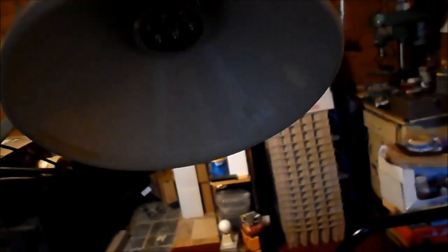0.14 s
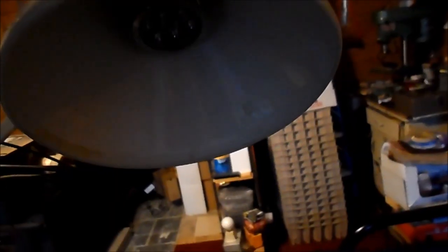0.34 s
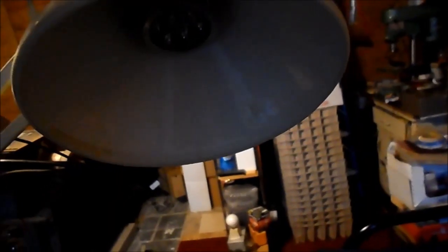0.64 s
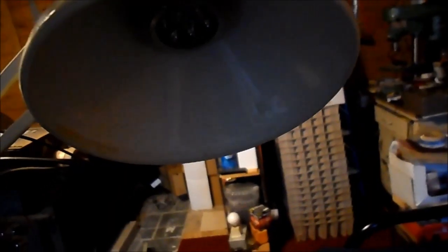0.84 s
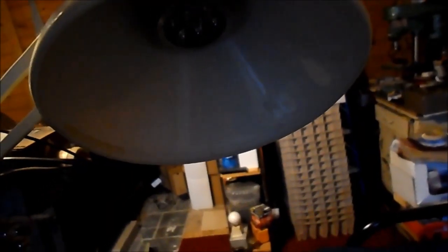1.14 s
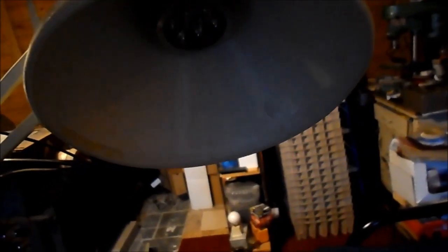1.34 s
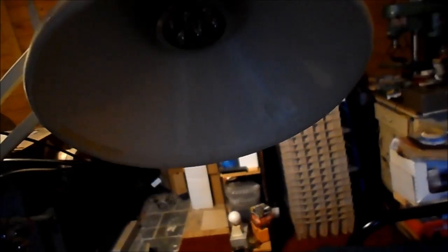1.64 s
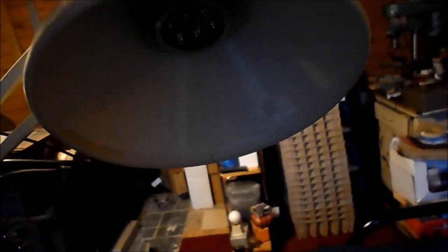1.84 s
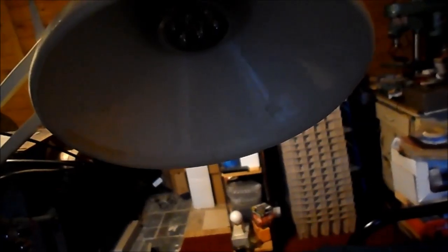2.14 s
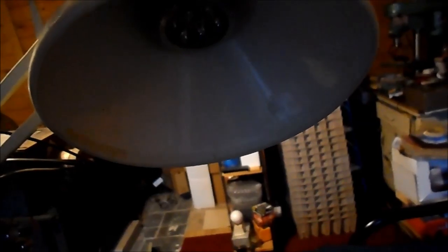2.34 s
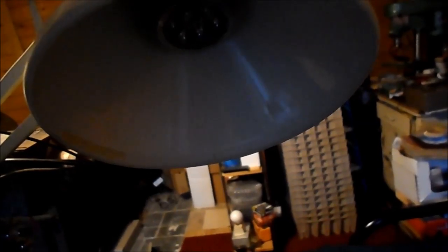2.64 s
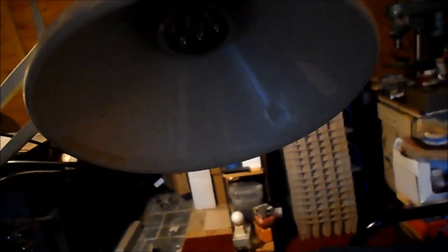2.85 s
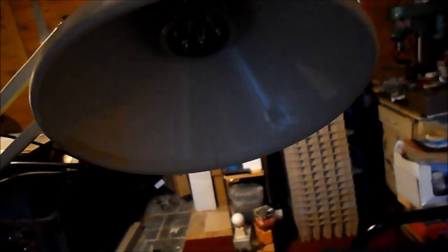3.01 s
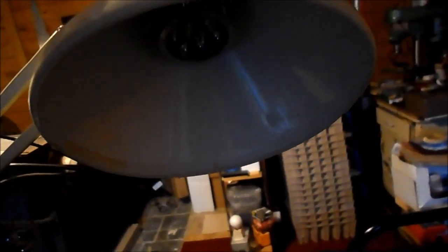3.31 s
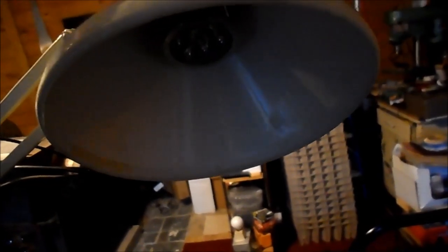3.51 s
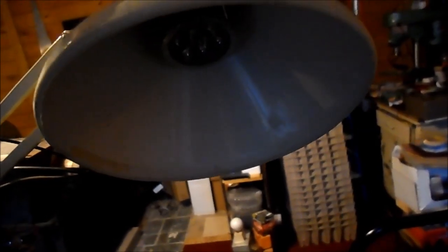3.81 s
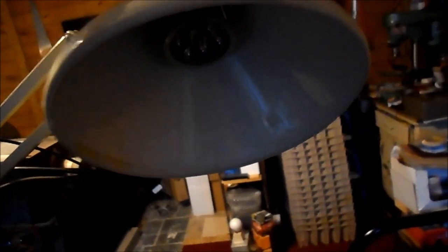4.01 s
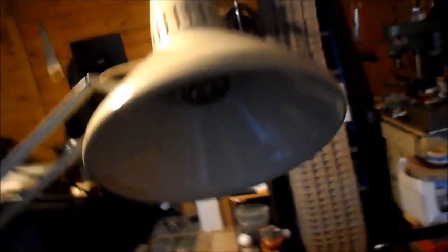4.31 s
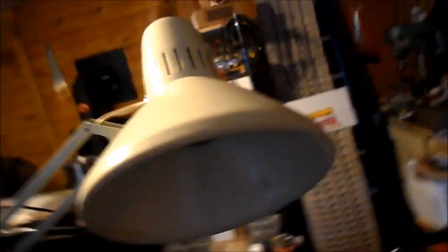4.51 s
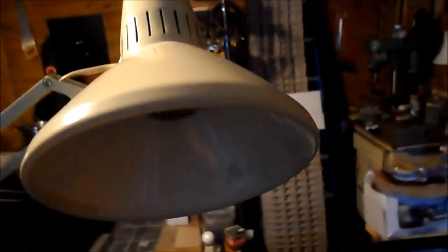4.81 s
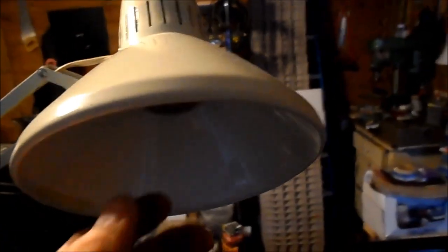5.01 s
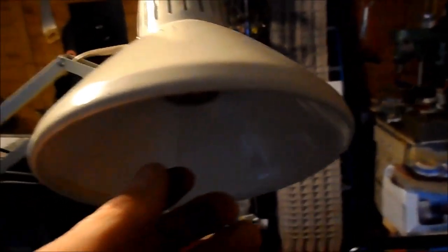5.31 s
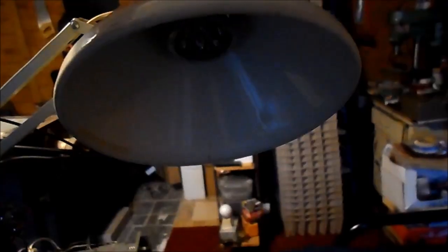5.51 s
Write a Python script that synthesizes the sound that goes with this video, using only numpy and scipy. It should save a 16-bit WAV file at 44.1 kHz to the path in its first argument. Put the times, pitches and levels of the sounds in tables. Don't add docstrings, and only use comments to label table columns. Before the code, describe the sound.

Mostly quiet mono sound, close and dry with a short indoor room tail. Two loud switch snaps stand out, the first bouncing, the second crisper; a slightly weaker knob click lands between them. Each makes the thin metal shade ring faintly. Small knocks, taps, grainy joint rubbing and grip rumble fill in later, over steady preamp hiss, mains hum and a faint pulsing whine.

```python
import sys
import numpy as np
from scipy import signal
from scipy.fft import rfft, irfft
from scipy.io import wavfile
from scipy.ndimage import uniform_filter1d

SR = 44100
rng = np.random.default_rng(int(sys.argv[2]) if len(sys.argv) > 2 else 0)


def generate_wav(signal):
    frames = np.transpose(np.atleast_2d(signal))
    scaled = np.clip(frames, -1, 1) * 32767
    pcm = np.round(scaled).astype(np.int16)
    wavfile.write(sys.argv[1], SR, pcm)


def boost(x):
    u = np.asarray(x, float) / 20
    return 10 ** u


N = 249606


def shaped(x, shape):
    hz, db = np.transpose(shape)
    f = np.arange(len(x) // 2 + 1) * SR / len(x)
    curve_db = np.interp(np.log(f + 1), np.log(hz), db)
    return irfft(rfft(x) * boost(curve_db), len(x))


def unit(x):
    return x / np.sqrt(np.sum(x ** 2))


def below(x, top_hz):
    return signal.sosfilt(signal.ellip(8, .2, 70, top_hz, fs=SR, output="sos"), x)


def noise(shape):
    x = shaped(rng.standard_normal(N), shape)
    return x / x.std()


def walk(rate_hz):
    k = int(SR / rate_hz)
    x = uniform_filter1d(uniform_filter1d(rng.standard_normal(N), k), k)
    return x / x.std()


def swells(table):
    t = np.arange(N) / SR
    power = np.zeros(N)
    for s, db, rise, fall in table:
        drop_db = np.where(t < s, rise * (s - t), fall * (t - s))
        power += boost(db - drop_db) ** 2
    return 10 * np.log10(power + 1e-14)


def rings(t, hz, t60, gain):
    fades = np.exp(-np.log(1000) * np.outer(1 / t60, t))
    return gain @ (fades * np.sin(2 * np.pi * np.outer(hz, t)))


def chatter(rattle_s):
    n = np.arange(512)
    fade = np.exp(-n / SR / rattle_s) * np.minimum(n / 6, 1)
    limit = fade / np.sqrt(np.sum(fade ** 2)) * 2
    x = rng.standard_normal(512) * fade
    for _ in range(6):
        tones = rfft(unit(x))
        x = np.clip(irfft(tones / np.abs(tones)), -limit, limit)
    return unit(x)


# (pitch [Hz], level [dB])
WALL_COLOUR = [(500, -5), (2000, -1), (8000, -3.5), (11000, -2), (14000, -11.5), (15800, -12),
               (16200, -43.5)]
SPOT_DB = 2


def echoes(t, hz, width, gain, crack_db, near_db, room_db, room_t60):
    f = np.arange(len(t) // 2 + 1) * SR / len(t)
    off_peak = (f - hz[:, None]) / (0.56 * width[:, None])
    spread = gain ** 2 @ (1 / width[:, None] / (1 + off_peak ** 2))
    spread = np.sqrt(spread / spread.mean() + boost(crack_db) ** 2)
    scatter = rng.standard_normal(len(t)) * boost(near_db) * np.exp(-t / 0.006)
    walls = shaped(rng.standard_normal(len(t)), WALL_COLOUR)
    walls *= boost(room_db) * np.exp(-np.log(1000) * t / room_t60)
    onset = 1 - np.exp(-t / 0.0011)
    return irfft(rfft(scatter + walls) * spread, len(t)) * onset * (t < .45)


def balanced(sound, bands_db, band_hz):
    power = np.abs(rfft(sound[:384])) ** 2
    f = np.arange(len(power)) * SR / 384
    have_db = [10 * np.log10(power[abs(np.log(f + 1) - np.log(c)) < .2].sum()) for c in band_hz]
    colour = sorted(zip(band_hz, np.array(bands_db) - have_db + 42))
    lowest_db, highest_db = colour[0][1], colour[-1][1]
    colour = [(420., lowest_db - 22)] + colour + [(15500., highest_db), (17000., highest_db - 20)]
    padded = shaped(np.r_[np.zeros(512), sound], colour)
    return padded * np.clip(np.arange(len(padded)) / 16 - 30.5, 0, 1)


def click(bands_db, band_hz, body, shade_modes, rattle_s, crack_db, shade_db, near_db, room_db, room_t60):
    t = np.arange(SR // 2) / SR
    hz, width, db = np.transpose(body)
    gain = boost(db + SPOT_DB * rng.standard_normal(len(hz))) * np.sqrt(width)
    signs = (-1) ** np.arange(len(hz))
    housing = unit(rings(t, hz, 2.55 / width, gain * signs)) + boost(crack_db) * (t == 0)
    direct = signal.fftconvolve(chatter(rattle_s), housing)[:len(t)]
    echo = echoes(t, hz, width, gain, crack_db, near_db, room_db, room_t60)
    shade_hz, db, t60 = np.transpose(shade_modes)
    shade_gain = boost(db + shade_db + SPOT_DB * rng.standard_normal(len(shade_hz)))
    shade = rings(t, shade_hz, t60, shade_gain) * (1 - np.exp(-t / 0.0024))
    return balanced(direct + echo + shade, bands_db, band_hz)


def clicks(table, body, shade_modes, tone, **how):
    out = np.zeros(N + SR)
    hz, tone_db = np.transpose(tone)
    octaves = np.log2(hz / 4000)
    for s, db, hard, spot_db in table:
        bands_db = db + tone_db + hard * octaves + spot_db * (-1) ** np.arange(len(hz))
        sound = click(bands_db, hz, body, shade_modes, **how)
        at = int(s * SR) - 512
        out[at:at + len(sound)] += sound
    return out[:N]


# (pitch [Hz], level [dB], t60 [s])
SHADE_MODES = [(2245, -15, 0.13), (3160, -18.5, 0.15), (3300, -16, 0.15), (3640, -14.5, 0.12),
               (4950, -7, 0.12), (5740, -12.5, 0.22), (6500, -8.5, .13), (7050, -12.5, 0.15),
               (8030, -10.5, .15)]
SWITCH_ON_BLOWS = [
    (1.4112, -12, 0.1, 0.1),
    (1.4200, -18.5, 0.1, 0.1),
]
SWITCH_ON_BODY = [(754, 64, -19), (2200, 450, -4.5), (3207, 220, -0.5), (4450, 600, -8), (5770, 130, 0.6),
                  (6540, 200, 0), (7600, 230, -9.5), (8230, 300, -7), (9250, 550, -5.5), (10300, 780, -31),
                  (12290, 130, -12), (13900, 800, -18)]
SWITCH_ON_TONE = [(900, -19.5), (2100, -15), (3200, -11), (5800, 0.5), (8800, -0.4), (12500, -8),
                  (15400, -14)]


def switch_on():
    return clicks(SWITCH_ON_BLOWS, SWITCH_ON_BODY, SHADE_MODES, SWITCH_ON_TONE, rattle_s=0.0015,
                  crack_db=-10.0, shade_db=-45, near_db=-26, room_db=-36, room_t60=.2)


SWITCH_OFF_BLOWS = [
    (3.9896, -12, -0.16, 0.3),
]
SWITCH_OFF_BODY = [(783, 67, -24), (2100, 300, -15.5), (3510, 270, -5), (4014, 250, -9), (5120, 820, -10.5),
                   (6200, 360, -10), (6970, 700, -4.5), (9040, 1700, 5), (10210, 320, -33.5),
                   (11300, 940, -12.5), (12340, 220, -10.5), (14820, 260, 0.5), (14390, 440, -6.5)]
SWITCH_OFF_TONE = [(900, -27), (2200, -15), (2800, -20), (3800, -7.5), (5800, -5.5), (8800, 0), (13000, -1)]


def switch_off():
    return clicks(SWITCH_OFF_BLOWS, SWITCH_OFF_BODY, SHADE_MODES, SWITCH_OFF_TONE, rattle_s=0.00069,
                  crack_db=-5.5, shade_db=-48.0, near_db=-31.5, room_db=-39.5, room_t60=.19)


# (pitch [Hz], t60 [s])
RIM_MODES = [(2632, .6), (2657, .6), (3206, .38), (3468, .36)]
# (time [s], then level of each long ring [dB])
RIM_BLOWS = [
    (1.412, -57, -58.5, -45, -54),
    (3.99, -68, -69, -51, -55.5),
]


def rim():
    t = np.arange(N) / SR
    hz, t60 = np.transpose(RIM_MODES)
    return sum(rings(np.maximum(t - s, 0), hz, t60, boost(dbs)) for s, *dbs in RIM_BLOWS)


# (pitch [Hz], level [dB], t60 [s])
SHADE_BELL = [(3206, -16, .38), (3468, -21, .36)]
KNOB_BLOWS = [
    (3.3301, -20.5, 0.46, 0.5),
    (4.2093, -34, -0.4, 2.5),
    (4.2653, -31.5, -0.39, 2.5),
    (4.2724, -32.5, -1.1, -2.5),
]
KNOB_MODES = [(797, 85, -5), (1800, 87, -5), (2256, 146, -2), (3280, 250, -8.5), (3620, 130, -9.5),
              (4946, 170, -4.5), (6260, 250, 1.5), (7100, 330, 1.5), (7940, 260, 1), (8600, 150, -4),
              (9400, 100, -8.5), (10000, 167, -13), (12840, 200, -43), (15300, 500, -27)]
KNOB_COLOUR = [(800, -26.5), (2200, -4), (3500, -11), (7000, -0.5), (12500, -22)]


def knob():
    return clicks(KNOB_BLOWS, KNOB_MODES, SHADE_MODES + SHADE_BELL, KNOB_COLOUR, rattle_s=0.00097,
                  crack_db=-25, shade_db=-39, near_db=-23, room_db=-33.5, room_t60=0.19)


JOINT_BLOWS = [(4.7824, -61, -9, 8), (4.8212, -55, 3, 2), (4.876, -65, -2.2, -1), (5.21, -41.5, -4, 0.5),
               (5.2179, -38, -0.7, 1), (5.263, -56.5, 3, 3), (5.4114, -67, 5.5, -2)]
JOINT_MODES = [(1420, 220, -27), (2300, 310, -9.5), (3210, 220, -7.5), (5160, 1400, -1.5), (8050, 710, 6),
               (9500, 730, 11.5), (12300, 170, -29), (13100, 500, -27)]
JOINT_COLOUR = [(900, -20.5), (2600, -4), (5800, -2.5), (8800, 2.5), (13000, -22)]


def joint_ticks():
    return clicks(JOINT_BLOWS, JOINT_MODES, SHADE_MODES, JOINT_COLOUR, rattle_s=.0003,
                  crack_db=-12.0, shade_db=-62, near_db=-38, room_db=-44, room_t60=.15)


# (peak time [s], rasp level [dB], build-up [dB per s], fade [dB per s])
JOINT_SLIPS = [
    (3.987, -56.5, 701, 2999.5),
    (4.62, -73, 400, 250),
    (4.8, -63, 78.5, 56),
    (4.824, -56, 1500, 150),
    (5.262, -66, 900, 240),
    (5.42, -75, 97, 300),
]
# (pitch [Hz], level [dB per Hz])
RASP_COLOUR = [(2500, -12.5), (4500, 0), (6500, 4.5), (9500, 5.5), (11000, -9), (14000, -42)]
THRUM_COLOUR = [(60, -6), (200, 6.5), (450, -2.5), (800, -2.5), (1300, -13.5), (2200, -5.5), (3200, -23.5)]


def rubbing():
    rasp_db = swells(JOINT_SLIPS)
    thrum_db = -58.5 + 0.45 * (rasp_db + 58.5)
    rasp = noise(RASP_COLOUR) * boost(rasp_db + 2.5 * walk(120))
    return rasp + noise(THRUM_COLOUR) * boost(thrum_db + 2.4 * walk(50))


TOUCH_BLOWS = [(0.7008, -46, 4, 3.5), (0.7741, -49.5, 0.3, -2.5), (2.1294, -62.5, 1, 2),
               (3.2146, -55.5, -4, -1.5), (3.4124, -50.5, 0, -2), (3.4494, -61.5, -4, -1),
               (3.467, -57, 5, -4)]
TOUCH_MODES = [(787, 120, -10), (2153, 110, -1.5), (3380, 150, 3), (5000, 470, -12), (5600, 400, -7.5),
               (6420, 250, 0.5), (7360, 680, -19)]
TOUCH_COLOUR = [(800, -4.5), (2200, 0), (3350, 0), (5200, -5.5), (6600, -4)]


def touches():
    return clicks(TOUCH_BLOWS, TOUCH_MODES, SHADE_MODES + SHADE_BELL, TOUCH_COLOUR, rattle_s=0.0012,
                  crack_db=-18, shade_db=-33.5, near_db=-26.5, room_db=-30.5, room_t60=0.18)


TAP_BLOWS = [
    (4.319, -56, 0.1, 5),
    (4.3485, -47.5, 0.1, 0.1),
    (4.357, -54.5, 0.1, 0.1),
]
TAP_MODES = [(1100, 250, -8), (1800, 150, -8), (2160, 200, -8), (3200, 170, -4), (4800, 200, -13),
             (5440, 200, -1), (6400, 500, -12)]
TAP_COLOUR = [(1100, -7.5), (2100, -6), (3200, 0), (5500, -4.5), (6600, -7)]


def taps():
    return clicks(TAP_BLOWS, TAP_MODES, SHADE_MODES + SHADE_BELL, TAP_COLOUR, rattle_s=0.0009,
                  crack_db=-21, shade_db=-30, near_db=-23, room_db=-29, room_t60=0.21)


# (peak time [s], rumble [dB], build-up [dB per s], fade [dB per s])
GRIP_SHIFTS = [(0.55, -61, 36, 17), (3.39, -63.5, 40, 45), (3.85, -62, 33, 45), (4.48, -54, 42, 80.5),
               (4.78, -50.5, 64.5, 63), (5.3, -53, 66, 50)]


def hand_rumble():
    grip_db = swells(GRIP_SHIFTS)
    level = np.hypot(boost(-61.5), boost(grip_db))
    rumble = noise([(2, -22), (8, 0.5), (22, -4.5), (31, 2.0), (42, -7.5), (80, -49.5)]) * level
    thump_db = -60 + 1.6 * (grip_db + 50) + 3.0 * walk(25)
    return rumble + noise([(30, -20), (50, 0), (100, -3), (180, -25)]) * boost(thump_db)


# (time [s], step [dB])
GAIN_STEPS = [
    (1.42, -2),
    (4.0, -2.5),
]


def gain_control_db():
    t = np.arange(N) / SR
    recover_s = 8.7
    return sum(db * (t > s) * np.exp((s - t) / recover_s) for s, db in GAIN_STEPS)


# (pitch [Hz], level [dB per Hz])
HISS_COLOUR = [(26, -34.5), (45, 1.5), (149, -9.5), (182, -7), (215, -10), (250, -10.5), (327, -12.5),
               (750, -18), (1150, -15), (1500, -19.5), (4000, -24.5), (9800, -25.5), (10600, -28),
               (15600, -28.5)]


def preamp_hiss(gain_db):
    return noise(HISS_COLOUR) * boost(-58 + gain_db + 0.23 * walk(5.6))


# (pitch [Hz], rms level [dB])
HUM_LINES = [(177.6, -80), (250, -64.5), (300, -80), (4091, -88), (5879, -90), (8010, -93.5), (8672, -86),
             (9539, -94), (11466, -87)]


def hum():
    t = np.arange(N) / SR
    out = np.zeros(N)
    for hz, db in HUM_LINES:
        level = np.sqrt(2) * boost(db + 1.1 * walk(11))
        out += level * np.sin(2 * np.pi * hz * t + 0.26 * walk(6))
    return out


def whine(gain_db):
    t = np.arange(N) / SR
    beat_hz, loudest_s, partner_db = .975, .97, -3
    pair = 1 + boost(partner_db) * np.exp(2j * np.pi * beat_hz * (t - loudest_s))
    tone = (pair * np.exp(2j * np.pi * 1500 * t)).imag
    return boost(-70 + gain_db + 0.88 * walk(4)) * tone


def background():
    gain_db = gain_control_db()
    return preamp_hiss(gain_db) + hand_rumble() + hum() + whine(gain_db)


def scene():
    lamp = switch_on() + switch_off() + rim() + knob() + joint_ticks() + touches() + taps()
    return (lamp + below(rubbing() + background(), 15700))[None]


def low_pass(x):
    return signal.sosfilt(signal.butter(12, 17070, fs=SR, output="sos"), x)


def record(dry):
    t = np.arange(N) / SR
    start_s, stop_s = 0.4457, 5.467
    rounded = np.tanh(1.15 * dry) / 1.15
    mix = below(rounded, 16500) * ((t > start_s) & (t < stop_s))
    return low_pass(mix)


dry = scene()
out = record(dry)
generate_wav(out)
```